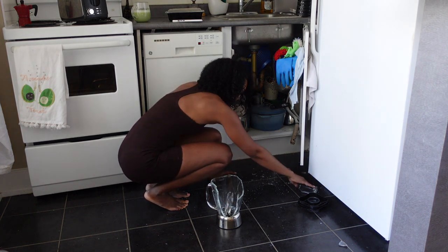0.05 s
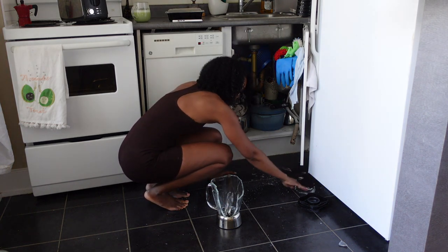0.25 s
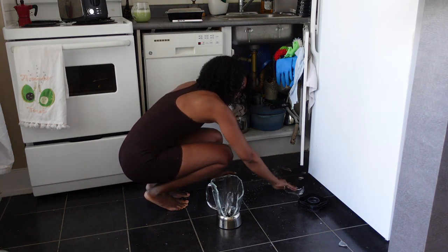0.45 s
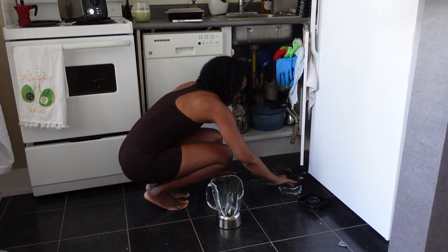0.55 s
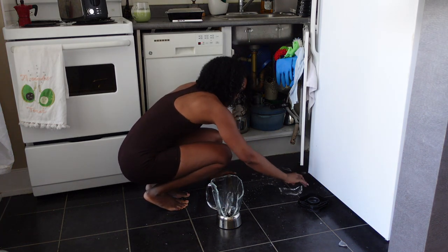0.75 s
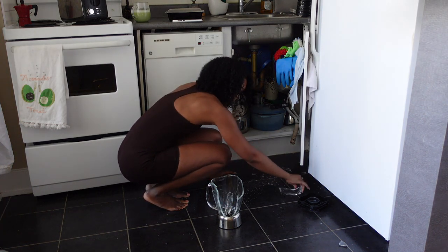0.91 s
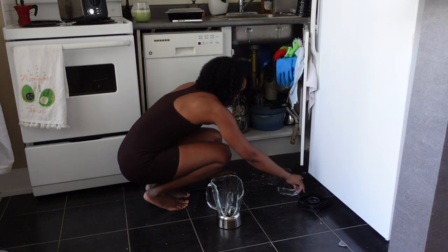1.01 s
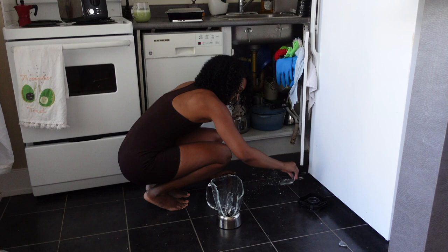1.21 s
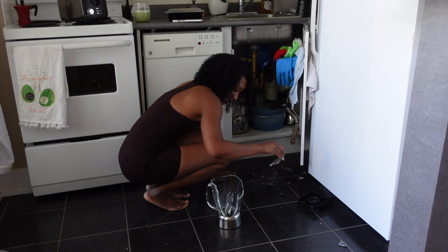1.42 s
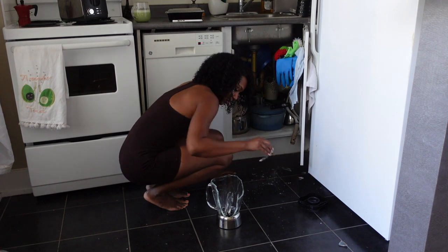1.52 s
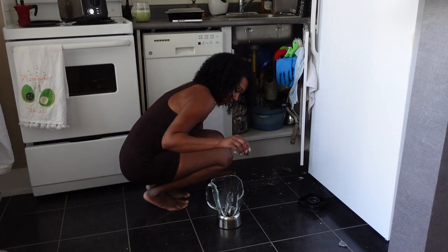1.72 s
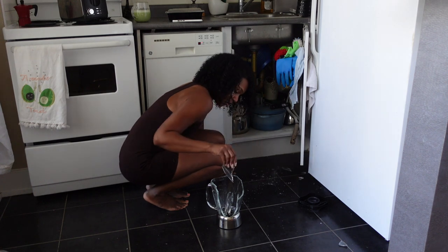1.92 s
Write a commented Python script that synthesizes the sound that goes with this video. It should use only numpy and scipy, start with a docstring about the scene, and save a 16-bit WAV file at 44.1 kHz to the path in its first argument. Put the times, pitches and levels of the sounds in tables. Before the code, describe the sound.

Broken glass is gathered from kitchen tile, heard close and loud. Faint ticks at 0.1 s lead to a dense run of bright clinks and gritty scraping from 0.2 to 0.6 s, a hard, sharp cluster at 0.8-0.9 s, and last clinks near 1.05 s. Peaks distort slightly; short room reflections ring off. Then steady hum with faint high whines remains, with barely audible ticks near 1.65 and 1.85 s.

```python
"""Close by the tile floor of a kitchen, over the room's steady hum and two faint wavering whines,
a hand gathers broken glass. One large shard is dragged, as random slips that ring its modes, and knocked
and tapped, as clicks that ring the same modes; both add bursts of noise. Early echoes and two random
tails make the room, and peaks that reach the input stage's ceiling are clipped. Last, the hum remains."""
import sys
import numpy as np
from scipy import signal
from scipy.fft import rfft, irfft
from scipy.io import wavfile
from scipy.ndimage import uniform_filter1d

SR = 44100
rng = np.random.default_rng(int(sys.argv[2]) if len(sys.argv) > 2 else 0)


def gain_from_db(level_db):
    """Turn a decibel level (scalar or array-like) into a linear amplitude factor."""
    decades = np.asarray(level_db, float) / 20
    return 10 ** decades


def dump(signal):
    """Clip the signal to [-1, 1] and save it as 16-bit WAV at the path in sys.argv[1]."""
    limited = np.clip(np.atleast_2d(signal).T, -1, 1)
    pcm = np.round(limited * 32767).astype(np.int16)
    wavfile.write(sys.argv[1], SR, pcm)


N = 85995  # samples, 1.95 s


def evened(x):
    """Scales a signal to an rms of 1."""
    return x / np.sqrt(np.mean(x ** 2) + 1e-20)


def read(points, hz):
    """Reads a (Hz, value) curve along a logarithmic frequency axis."""
    f, value = np.transpose(points)
    return np.interp(np.log(hz + 1), np.log(f + 1), value)


def shaped_noise(gain):
    """White noise filtered by a gain for each frequency bin."""
    return irfft(rfft(rng.standard_normal(N)) * gain, N)


def hum():
    """The kitchen's steady coloured noise, lightly patchy and partly alike left and right, and its whines."""
    # Spectrum of the hum. Each row: frequency in Hz, relative level in dB.
    hum_colour = [(15, -81), (25, -48), (107, -49.5), (174, -3), (275, 1), (298, -1), (323, -9.5), (423, 3),
                  (668, -9.5), (807, -3.5), (1060, -10.5), (1310, -7.5), (1910, -19.5), (4170, -25.5),
                  (4520, -24.5), (6960, -27), (15600, -35)]
    # How alike the two channels are. Each row: frequency in Hz, left-right likeness from 0 to 1.
    hum_likeness = [(60, 0.76), (240, 0.9), (950, 0.86), (3770, 0.76), (15000, 0.31)]
    hum_db, patch_db = -44, 1.2  # rms levels
    frames, hz = N // 256 + 5, np.fft.rfftfreq(1024, 1 / SR)
    a, b, c, d, patches = rng.standard_normal((frames, 513, 5)).T
    patches = uniform_filter1d(patches, 10, 0)  # over frequency bins
    patches = evened(uniform_filter1d(patches, 12, 1))  # over frames
    same = read(hum_likeness, hz)[:, None]
    left, other = a + 1j * b, c + 1j * d
    z = np.array([left, same * left + np.sqrt(1 - same ** 2) * other])
    z = z * gain_from_db(read(hum_colour, hz)[:, None] + patch_db * patches)
    noise = signal.istft(z, nperseg=1024, noverlap=768)[1][:, :N]
    return gain_from_db(hum_db) * evened(noise) + whines()


def whines():
    """Two faint wavering tones, each a narrow band of noise, equal left and right."""
    # Centre of each whine in Hz.
    whine_centres = [4480, 5990]
    # Each row: width in Hz, rms level in dB.
    whine_bands = [(50, -67), (60, -76)]
    hz = np.fft.rfftfreq(N, 1 / SR)
    out = np.zeros(N)
    for centre, (width, db) in zip(whine_centres, whine_bands):
        out += gain_from_db(db) * evened(shaped_noise(np.exp(-((hz - centre) / width) ** 2)))
    return out


def drag_slips():
    """Dragging over tile is a random train of slips of uneven strength, drawn for each mode family."""
    # Loudness of the drag. Each row: time in seconds, relative level in dB.
    drag_level = [(.05, -78), (.075, -51), (.13, -73.5), (.2, -65), (.28, -40), (.34, -48.5), (.375, -27.5),
                  (.42, -24), (.47, -37), (.5, -29), (.555, -37), (.6, -37), (.64, -48), (.68, -53),
                  (.8, -49), (.86, -30.5), (.95, -51), (1.03, -47), (1.07, -42), (1.15, -73.5), (1.25, -90)]
    slips_per_s, spread_db = 300, 5.5
    level = gain_from_db(np.interp(np.arange(N) / SR, *np.transpose(drag_level)))
    shape = (5, N)  # five families of modes
    strength = gain_from_db(spread_db * np.minimum(rng.exponential(1, shape), 4))
    return level * strength * (rng.random(shape) < slips_per_s / SR)


def knocks():
    """Each knock is one click into every mode family, and one summed blow for the crack."""
    # Each row: start in seconds, then how strongly each family of modes is struck in relative dB:
    # fourth family, lowest, second, third, highest.
    knock_list = [(0.0687, -54.5, -39, -43, -81, -44), (0.0904, -39, -33.5, -66, -47, -57.5),
                  (0.1106, -38, -50, -45, -36.5, -50), (0.1935, -35.5, -50, -51, -50.5, -43.5),
                  (0.2184, -16.5, -41, -19, -17, -34), (0.2234, -5.5, -20.5, -39, -8, -49.5),
                  (0.2369, -23, -17.5, -20, -12, -37.5), (0.2574, -9, -44, -24.5, -14, -51),
                  (0.3082, -9, -43, -33, -34.5, -36), (0.3244, -22.5, -29, -30.5, -21, -35.5),
                  (0.3586, -22, -33.5, -20.5, -17.5, -42), (0.3814, -18, -13, -22, -1, -34),
                  (0.3885, -14.5, -8.5, -5.5, -1.5, -35.5), (0.4114, -13, -22, -12, -2.5, -41),
                  (0.4194, -12, -27, -10, -16, -35), (0.4444, -14, -30, -10.5, -10.5, -33),
                  (0.4674, -10, -24.5, -21.5, -22, -37), (0.4884, -12.5, -11, -3.5, -16, -39.5),
                  (0.5297, -44, -22.5, -11.5, -15.5, -32), (0.5694, -24, -27, -19.5, -15, -32.5),
                  (0.5814, -36, -13.5, -16, -17, -24), (0.5944, -25.5, -28, -10, -4.5, -18),
                  (0.6114, -23, -37, -17, -10, -19), (0.7034, -36, -41, -24, -25, -27),
                  (0.8149, 0, -8, -25, -24, -18.5), (0.8274, -10.5, -5.5, -21.5, -23, -4),
                  (0.8414, -8, -14, -6, -21, -4.5), (0.8614, -22, -25, -5.5, -8.5, -14.5),
                  (0.8779, -16, -57, -22.5, -18, -32), (0.9363, -18.5, -23, -37, -23, -37),
                  (1.0399, -9, -22, -15, -42, -24.5), (1.0514, -33, -20, -23.5, -23, -28),
                  (1.1094, -42, -39, -70, -56.5, -59), (1.6566, -51.5, -69.5, -66, -76, -58),
                  (1.8594, -72, -68.5, -62, -55, -71)]
    # How much each family's blow adds to the crack, lowest family first (plain factors).
    crack_share = [0.38, 0.91, 0.57, 0.54, .45]
    clicks, blows = np.zeros((5, N)), np.zeros(N)
    for s, fourth_db, low_db, second_db, third_db, high_db in knock_list:
        at = round(s * SR)
        levels = gain_from_db(np.array([low_db, second_db, third_db, fourth_db, high_db]))
        clicks[:, at] += levels
        blows[at] += np.linalg.norm(levels * crack_share)
    return clicks, blows


def chattered(blows):
    """Spreads each blow over the short, dying chatter of the edges."""
    contact_s = 0.006  # time constant
    chatter = np.exp(-np.arange(400) / SR / contact_s)
    return signal.fftconvolve(blows, chatter / np.linalg.norm(chatter))[:N]


def crack(size, colour):
    """Bursts of coloured noise that start with each click and die fast."""
    t60 = 0.028  # s
    t = np.arange(SR // 8) / SR
    power = np.abs(signal.fftconvolve(size ** 2, gain_from_db(-120 * t / t60))[:N])
    noise = shaped_noise(gain_from_db(read(colour, np.fft.rfftfreq(N, 1 / SR))))
    return evened(noise) * np.sqrt(power)


def ring(hz, db, t60):
    """One click into one mode: a sine that builds during contact, then falls at two speeds."""
    rise_s = 0.0011
    damped_db, damped_t60 = -1, 0.019  # the part that dies at once against tile and fingers
    t = np.arange(SR // 2) / SR
    fall = gain_from_db(db - 60 * t / t60) + gain_from_db(db + damped_db - 60 * t / damped_t60)
    return (1 - np.exp(-t / rise_s)) ** 2 * fall * np.sin(2 * np.pi * hz * t)


def waver(depth):
    """The shard rocks, so a mode's gain wanders about 1, by an rms of depth."""
    flutter_hz = 35
    n = N // 64 + 1  # one point every 64 samples
    hz = np.fft.rfftfreq(n, 64 / SR)
    slow = irfft(rfft(rng.standard_normal(n)) * np.exp(-(hz / flutter_hz) ** 2), n)
    return 1 + depth * np.interp(np.arange(N) / 64, np.arange(len(slow)), evened(slow))


def shard():
    """Knocks and the slips of dragging ring the same modes, and both add bursts of noise."""
    # The shard's modes: one row for each family, lowest first, holding the frequencies in Hz.
    modes_hz = [
        [2056, 2075, 2215],
        [2455, 2610, 2713, 2840, 3432, 3494, 4020],
        [4860, 4959, 5016],
        [6490, 6518, 8660, 8705, 10020],
        [10034, 12496, 13090, 13972, 14535],
    ]
    # The same modes in the same order. Each entry: relative strength in dB, ring T60 in seconds.
    mode_rings = [
        [(-6, .15), (-12, .12), (-16, .12)],
        [(-15, .07), (-12, .08), (-9, .09), (-14, .07), (-11, .23), (-14, .2), (-20, .1)],
        [(-18, .12), (-9, .16), (-7, .2)],
        [(-12, .14), (-8, .17), (-24, .15), (-20, .2), (-26, .2)],
        [(-8.5, .21), (-12, .17), (-30, .1), (-10, .16), (-7, .12)],
    ]
    # How deeply each family's loudness wavers, lowest first (rms factor).
    flutter_depth = [.08, .15, .1, .15, .35]
    # How strongly the drag drives each family, lowest first (relative dB).
    drag_family_db = [-21.5, -5, -17, -1, -16.5]
    # Noise of the knocks. Each row: frequency in Hz, relative level in dB.
    crack_colour = [(1000, -19), (1600, -22.5), (2200, 14.5), (3200, 8.5), (5000, 0.5), (7000, 0.5),
                    (8500, -20.5), (11000, -21), (14500, -28), (15800, -52.5)]
    # Treble noise of knocks on the thin edge. Each row: frequency in Hz, relative level in dB.
    fizz_colour = [(8000, -25.5), (10000, 1.5), (11200, -38), (12500, -4.5), (13300, -2), (14300, 3),
                   (15200, -2.5), (15900, -22.5)]
    # Noise of the slips. Each row: frequency in Hz, relative level in dB.
    grit_colour = [(1000, -25), (1500, -9), (2300, -10.5), (3300, 1.5), (5000, -2), (7000, -10),
                   (9000, -15.5), (11000, -27), (12500, -22.5), (14500, -19.5), (15800, -50)]
    crack_db, fizz_db, grit_db = -8, -16.5, -10.5  # gains
    fizz_power = 0.8  # soft knocks are noisier up high, hard ones ring cleaner
    slips = drag_slips()
    clicks, blows = knocks()
    out = gain_from_db(crack_db) * crack(chattered(blows), crack_colour)
    out += gain_from_db(fizz_db) * crack(chattered(clicks[-1] ** fizz_power), fizz_colour)
    out += gain_from_db(grit_db) * crack(slips.sum(0), grit_colour)
    for k, family in enumerate(modes_hz):
        drive = clicks[k] + gain_from_db(drag_family_db[k]) * slips[k]
        for hz, (db, t60) in zip(family, mode_rings[k]):
            ringing = signal.fftconvolve(drive, ring(hz, db, t60))[:N]
            out += waver(flutter_depth[k]) * ringing
    return out


def kitchen(x):
    """Direct sound and early echoes; the moving hand feeds two different tails in turn."""
    # Early echoes. Each row: delay in seconds, left level in dB, right level in dB, against the direct sound.
    early_echoes = [(.0021, -18.5, -18.5), (.0064, -11, -10.5), (.011, -13, -9.5), (.017, -18, -24)]
    hand_turns_per_s = 1.2
    near = np.zeros((2, SR // 20))
    near[:, 0] = 1
    for s, left_db, right_db in early_echoes:
        near[:, round(s * SR)] = gain_from_db(np.array([left_db, right_db]))
    turn = 2 * np.pi * hand_turns_per_s * np.arange(N) / SR
    paths = [(x, near), (x * np.cos(turn), tail()), (x * np.sin(turn), tail())]
    return sum(signal.fftconvolve(v[None], taps, axes=1)[:, :N] for v, taps in paths)


def tail():
    """Sparse random taps whose bands die at their own speeds, nearly alike left and right."""
    # Decay of the room. Each row: frequency in Hz, T60 in seconds.
    room_t60 = [(1500, .45), (4000, .42), (8000, .33), (11000, .27), (15000, .19)]
    room_db, same = -3, 0.93  # gain; left-right likeness
    taps = np.zeros((2, SR // 2))
    slots = np.arange(200, SR // 2 - 20, 20)
    at = slots + rng.integers(0, 20, (2, len(slots)))  # one tap somewhere in each slot
    np.put_along_axis(taps, at, rng.choice([-1., 1.], at.shape), 1)
    hz, t, z = signal.stft(taps, SR, nperseg=256)
    fall = gain_from_db(-60 * t / read(room_t60, hz)[:, None])
    a, b = signal.istft(z * fall, SR, nperseg=256)[1]
    pair = np.array([a, same * a + np.sqrt(1 - same ** 2) * b])
    return gain_from_db(room_db) * pair / np.linalg.norm(a)


def scene():
    """The shard in its kitchen, a touch louder on the left, over the hum."""
    balance_db = np.array([[.2], [-.2]])  # left, right
    return kitchen(shard()) * gain_from_db(balance_db) + hum()


def top_cut(x):
    """Nothing passes above the cut-off."""
    return signal.sosfilt(signal.butter(12, 15760, fs=SR, output="sos"), x)


def record(dry):
    """The microphone's input stage clips, a little sooner on the negative side."""
    clipped = np.clip(dry, -0.97, 1.0)
    return top_cut(clipped)


dry = scene()
out = record(dry)
dump(out)
```